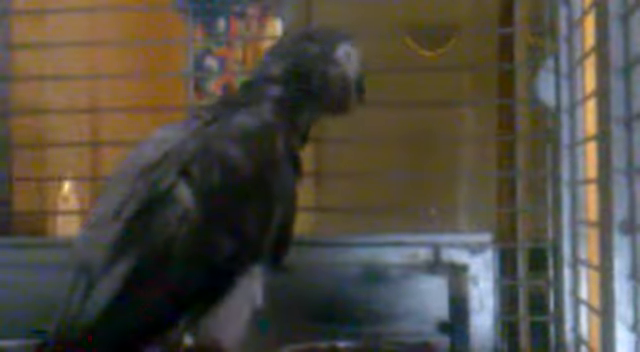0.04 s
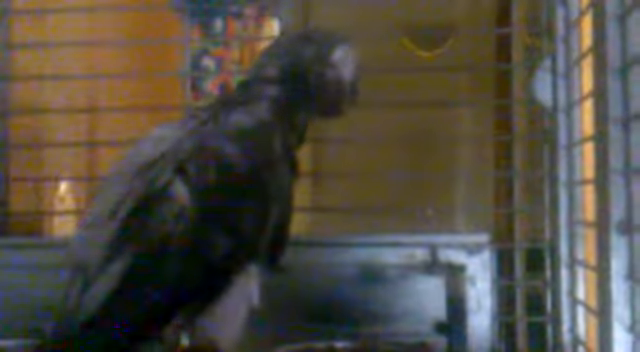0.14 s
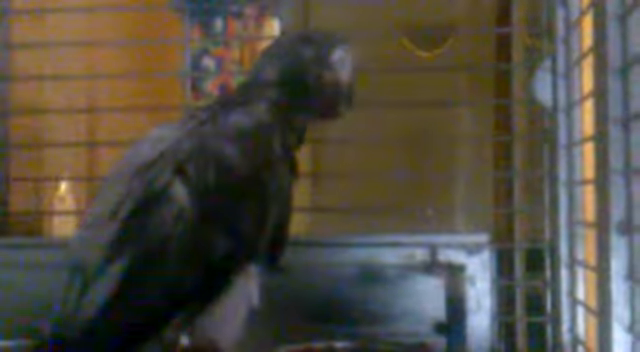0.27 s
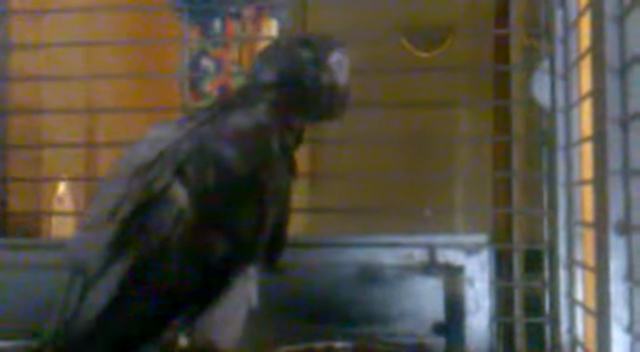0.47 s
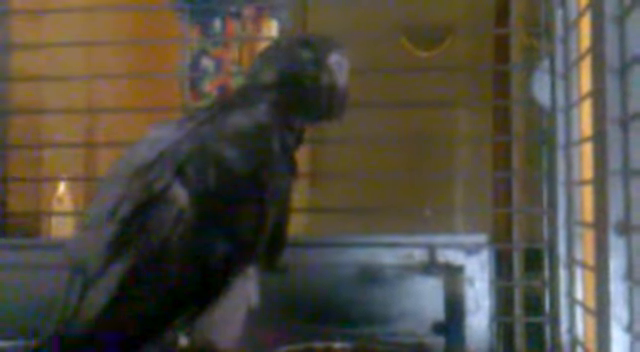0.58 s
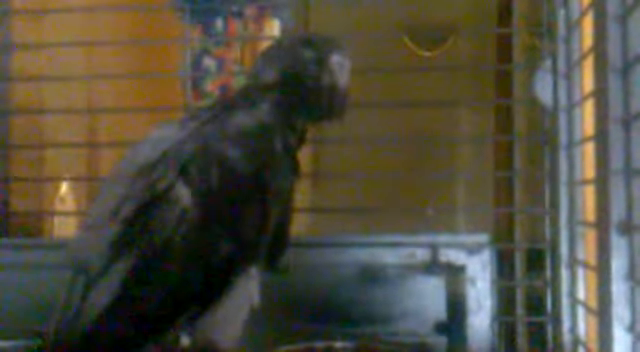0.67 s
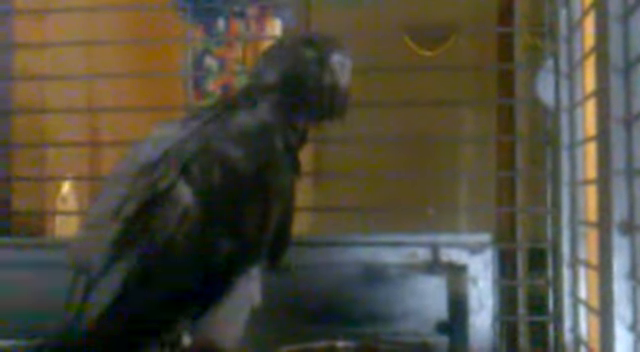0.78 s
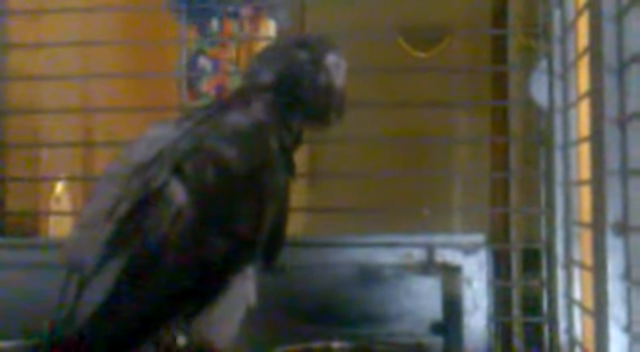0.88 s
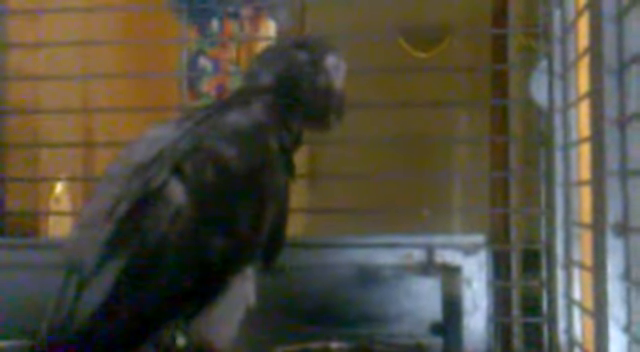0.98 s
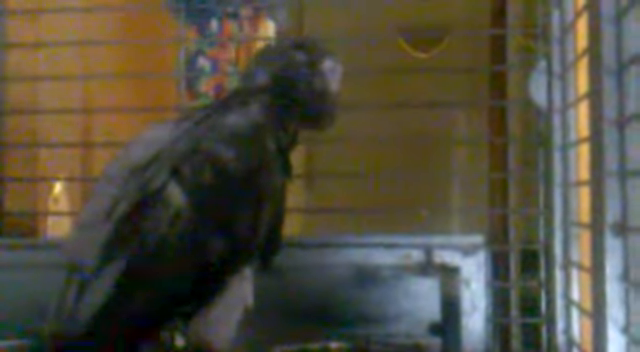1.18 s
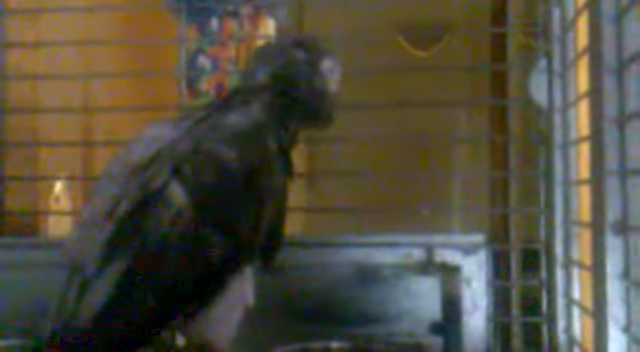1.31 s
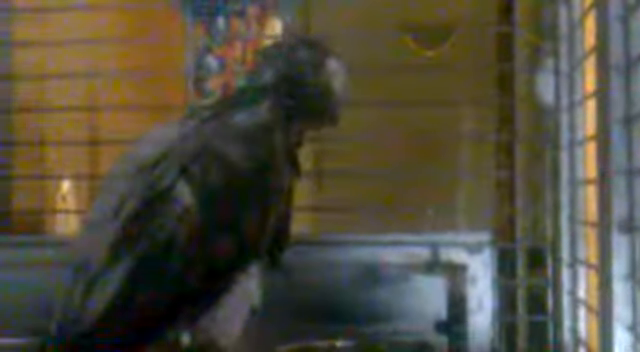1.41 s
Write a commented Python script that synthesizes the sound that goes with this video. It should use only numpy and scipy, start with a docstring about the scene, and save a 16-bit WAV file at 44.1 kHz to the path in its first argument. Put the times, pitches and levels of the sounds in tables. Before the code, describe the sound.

A parrot calls in a small hard room. A very short rising chirp at 0.05 s, a soft beak click at 0.12, then a fluttering hoarse rasp from 0.14 breaks into a piercing, overloaded squeal at 0.31-0.37. Room tail and thin metallic cage ring fade over a faint low hum, ducked by noise suppression. A weak high peep at 0.97 leads to a lower, harsh squawk at 1.06-1.17, then decay.

```python
"""In a small hard room, a parrot in a wire cage: a chirp, a rasp breaking into a squeal, a peep, a harsh squawk.
Its voice is one high tone with overtones that flutters and turns hoarse; husky puffs and a beak click join it.
The room answers with a tail of shaped noise, and the cage wire with two decaying sine rings.
An appliance hums behind it as unsteady sine lines over a dull rumble of noise.
The recorder's noise suppressor turns the sound down between calls; the loudest notes overload the microphone."""
import sys
import numpy as np
from scipy import signal
from scipy.fft import rfft, irfft, next_fast_len
from scipy.io import wavfile
from scipy.ndimage import uniform_filter1d, map_coordinates

SR = 44100
rng = np.random.default_rng(int(sys.argv[2]) if len(sys.argv) > 2 else 0)


def to_wav(s):
    """Save 16-bit WAV."""
    ch = np.atleast_2d(s).T  # columns
    pcm = np.round(np.clip(ch, -1, 1) * 32767)  # PCM
    wavfile.write(sys.argv[1], SR, pcm.astype(np.int16))


N = 63945  # samples


def amp(db):
    """Decibels to gain."""
    return 10 ** (np.asarray(db) / 20)


def unit(x):
    """Scale to rms 1."""
    return x / np.sqrt(np.mean(x ** 2) + 1e-20)


def along(points, hz):
    """Read (freq_hz, value) points on a log frequency axis."""
    point_hz, values = np.transpose(points)
    return np.interp(np.log(hz + 1), np.log(point_hz + 1), values)


def wobble(rate_hz):
    """A smooth random curve through rate_hz random knots a second."""
    return map_coordinates(rng.standard_normal(N // 8), [np.arange(N) * rate_hz / SR], mode="wrap")


def filtered(x, response):
    """Multiply the spectrum of x by a response of frequency."""
    padded = next_fast_len(N + SR // 2)
    hz = np.fft.rfftfreq(padded, 1 / SR)
    return irfft(rfft(x, padded) * response(hz), padded)[:N]


def noise(spectrum):
    """Coloured noise of rms 1."""
    return unit(filtered(rng.standard_normal(N), lambda hz: amp(along(spectrum, hz))))


def band(centre_hz, width_hz):
    """Noise of rms 1 in one bell-shaped resonance."""
    return unit(filtered(rng.standard_normal(N), lambda hz: np.exp(-((hz - centre_hz) / width_hz) ** 2 / 2)))


# The appliance's hum lines: freq_hz, level_db (rms, before the recorder)
HUM_LINES = [(55, -48.5), (119, -60), (165, -55), (328.4, -67.5), (485.5, -51.5)]
# Colour of the rumble under them: freq_hz, density_db (per Hz, relative)
RUMBLE_COLOUR = [(20, -11), (60, -0.5), (100, -6), (180, -10), (300, -16), (600, -18), (1200, -23.5),
                 (3000, -24), (8000, -31.5), (15000, -31.5)]
RUMBLE_DB = -49.5  # rms, before the recorder


def appliance():
    """Hum lines that drift slightly in level and phase, over a dull noise rumble."""
    t = np.arange(N) / SR
    lines = np.zeros(N)
    for hz, level_db in HUM_LINES:
        level = amp(level_db + 1.4 * wobble(5.4))
        lines += level * np.sin(2 * np.pi * (hz * t + rng.random()) + .2 * wobble(5.1))
    return np.sqrt(2) * lines + amp(RUMBLE_DB) * noise(RUMBLE_COLOUR)


# How long the room rings: freq_hz, t60_s
ROOM_T60 = [(200, 0.27), (1000, .36), (2200, 0.32), (3300, 0.33), (3900, 0.34), (5000, 0.3), (7000, .3),
            (12000, 0.19)]
# The tail's tint: freq_hz, gain_db
ROOM_COLOUR = [(300, -1), (1400, -0.5), (2200, -2.5), (2700, 2.5), (3200, -1.5), (3550, -3.5), (3900, 0),
               (4400, -1.5), (5200, 3), (5900, 0.5), (6600, 0.5), (8000, 0.5), (14000, -1)]
# The cage wire's ring: freq_hz, t60_s, level_db
CAGE = [(3205, .62, -7), (3880, .5, -13)]
ROOM_DB, WALL_DELAY_S = -2.5, .004  # tail re direct sound before its tint; the tail is half risen at the delay


def room(x):
    """Direct sound at the microphone, plus the room's decaying tail and the cage wire's narrow ring."""
    hz, t, grid = signal.stft(rng.standard_normal(SR * 3 // 4), SR, nperseg=256)
    tail_db = along(ROOM_COLOUR, hz)[:, None] - 60 * t / along(ROOM_T60, hz)[:, None]
    tail = signal.istft(grid * amp(tail_db), SR, nperseg=256)[1]
    age = np.arange(len(tail)) / SR
    tail = tail * np.clip(age / WALL_DELAY_S - .5, 0, 1)
    # level the tail by its decay at the first wire ring's frequency
    plain_decay = amp(-60 * age / along(ROOM_T60, CAGE[0][0]))
    answer = amp(ROOM_DB) * tail / np.linalg.norm(plain_decay)
    for ring_hz, t60, level_db in CAGE:
        fade = amp(-60 * age / t60)
        answer = answer + amp(level_db) * 2 * fade / fade.sum() * np.sin(2 * np.pi * ring_hz * age)
    return x + signal.fftconvolve(x, answer)[:N]


# Brief husky puffs: peak_s, half_length_s, level_db, centre_hz, half_width_hz
PUFFS = [(.185, 0.0399, -42, 378.3, 69), (.195, .05, -42, 880, 220), (0.195, 0.054, -33.5, 1946, 450),
         (0.352, .012, -21.5, 2006, 200), (0.995, .005, -42, 1900, 199.8), (1.027, .02, -41, 1634, 230),
         (1.085, .025, -35.5, 1336, 99.3), (1.129, .016, -35.5, 734, 81.4), (1.166, 0.01, -25.5, 1402, 141)]


def puffs():
    """Air swells and fades in one low resonance at a time."""
    t = np.arange(N) / SR
    total = np.zeros(N)
    for peak_s, half_s, level_db, centre_hz, width_hz in PUFFS:
        swell = np.exp(-((t - peak_s) / half_s) ** 2)
        total += amp(level_db) * swell * band(centre_hz, width_hz)
    return total


EDGE_S = 0.00095  # rise of the click and of each call
CLICK_S, CLICK_DB, CLICK_T60 = .119, -25.5, 0.023  # start s, level dB, decay s
# Colour of the beak's click: freq_hz, density_db (per Hz, relative)
BEAK = [(300, -23.5), (900, -17.5), (1400, -4), (1900, 0.5), (3000, -5), (6000, -29), (15000, -55)]


def beak_click():
    """A soft click as the beak opens for the rasp: a decaying burst of coloured noise."""
    age = np.arange(N) / SR - CLICK_S
    decay = amp(CLICK_DB - 60 * np.abs(age) / CLICK_T60)
    return np.clip(age / EDGE_S, 0, 1) * decay * noise(BEAK)


# The throat's colour on the hoarse part: freq_hz, density_db (per Hz, relative)
THROAT = [(600, -48.5), (1020, -32.5), (1350, -20.5), (1620, -19), (2050, -0.5), (2500, -2), (3100, -2.5),
          (3900, 0.5), (5000, -3), (5900, -15.5), (7000, -24), (7800, -28), (11000, -36.5), (15500, -45.5)]
# Air rushing through the beak: freq_hz, density_db (per Hz, relative)
AIR = [(100, -15), (250, -8), (400, 0.5), (750, -2), (1100, 0.5), (2000, -4), (5000, -18), (15000, -36.5)]
FLUTTER_HZ, TREMBLE_HZ = 749.1, 379.7  # random knots per second in pitch and in level
GRAIN_HZ, GRAIN_DB = 330, 2  # uneven bursts of hoarse noise: knots per second, depth
# upper resonance: dB re the hoarseness when the call is at 0 dB, then dB gained per dB of call level
SHRILL_HZ, SHRILL_WIDTH_HZ, SHRILL_DB, SHRILL_GROWTH = 6700, 380, -12, 0.55


def call(rows, voice):
    """One call: a fluttering, trembling tone with overtones and growl, and hoarse noise shriller when louder."""
    flutter, tremble_db, third_db, growl_db, air_db = voice
    t = np.arange(N) / SR
    time_s, *columns = np.transpose(rows)
    hz, level_db, octave_db, hoarse_db = [np.interp(t, time_s, column) for column in columns]

    phase = 2 * np.pi * np.cumsum(hz * (1 + flutter * wobble(FLUTTER_HZ))) / SR
    tone = np.sin(phase) + amp(octave_db) * np.sin(2 * phase)
    tone += amp(third_db) * np.sin(3 * phase)
    tone += amp(growl_db) * (np.sin(phase / 2) + np.sin(1.5 * phase))  # half-pitch growl
    tremble = unit(amp(tremble_db * np.minimum(wobble(TREMBLE_HZ), 1)))

    shrill = amp(SHRILL_DB + SHRILL_GROWTH * level_db) * band(SHRILL_HZ, SHRILL_WIDTH_HZ)
    hoarse = noise(THROAT) + shrill
    bursts = unit(amp(GRAIN_DB * np.minimum(wobble(GRAIN_HZ), 1)))

    sound = np.sqrt(2) * tremble * tone
    sound += amp(hoarse_db) * bursts * hoarse
    sound += amp(air_db) * noise(AIR)
    gate = np.clip(np.minimum(t - time_s[0], time_s[-1] - t) / EDGE_S + .5, 0, 1)
    return gate * amp(level_db) * sound


# The course of each call: time_s, pitch_hz, level_db, octave_db (re the tone), hoarse_db (re the tone)
CHIRP = [(.041, 2250, -42.5, -20.5, -38.5), (.045, 2500, -25, -19, -37.5), (.051, 2657, -26, -16, -36),
         (.055, 2855, -18, -25, -42.5), (.059, 3093, -12, -32.5, -47.5), (.063, 3350, -32, -26, -37.5)]
RASP = [(.14, 2750, -43, -22.5, -4), (.165, 2650, -28, -26, -11), (.195, 2700, -31, -25, -6.5),
        (.202, 2830, -22, -28, -10), (.23, 3100, -23, -19.5, -7), (.24, 2501, -21.5, -8, -6.5),
        (.25, 2203, -24, 2.5, -3), (.262, 1990, -26, -6.5, -1), (.274, 2857, -17.5, -8.5, -5.5),
        (.283, 3107, -27, -14, -6), (.293, 2593, -20.5, -13.5, -1.5), (.299, 3218, -20, -18, -3),
        (.305, 3170, -24, -18, 0.5), (.311, 3270, -15, -28.5, -9.5), (.322, 3180, -14, -28, -13.5)]
SQUEAL = [(.305, 4350, -21, -38, -10), (.313, 4750, -9, -42, -14), (.318, 4400, -9, -38, -16),
          (.321, 4000, -16, -31, -13), (.325, 3800, 1, -37.5, -22), (.331, 3280, -1.5, -24, -19),
          (.339, 3150, -2, -23, -13), (.348, 2950, -14, -8, 5), (.355, 3250, -1, -23, -17),
          (.363, 3230, -2, -22, -18), (.371, 3190, -25, -20, -7)]
PEEP = [(.971, 3226, -36.5, -18.5, -14.5), (.975, 3330, -25.5, -19.5, -16.5),
        (.985, 3386, -23.5, -29.5, -15.5), (.99, 3400, -32.5, -23.5, -5.5), (1.008, 3300, -27, -26.5, -13),
        (1.018, 3106, -29, -18.5, -5.5), (1.04, 3150, -35, -13, 2), (1.058, 3050, -35, -14, 2)]
UNDERTONE = [(.965, 2450, -59, 21, -2), (.969, 2530, -54, 18.5, -4.5), (.975, 2552, -41, 1, -12.5),
             (.983, 2540, -27, -7, -16), (.988, 2540, -45, -5, -12), (1.011, 2560, -58.5, 8.5, -2.5),
             (1.014, 2585, -50.5, 18.5, -2), (1.018, 2600, -57, 8.5, -1)]  # a second voice under the peep
SQUAWK = [(1.056, 2799, -30.5, -3.5, -2.5), (1.073, 2249, -26, -1, 3), (1.078, 2154, -21.5, 5, 1),
          (1.086, 2016, -16, 0, -3.5), (1.091, 1950, -4, -4.5, -10.5), (1.097, 2054, -15.5, 1.5, -3.5),
          (1.105, 2339, -5.5, -9, -8.5), (1.112, 2280, -14.5, 1.5, -0.5), (1.121, 2199, -15.5, 4.5, 3),
          (1.131, 2081, -12.5, 3.5, -1), (1.141, 2199, -12, -6.5, -1.5), (1.151, 2547, -16.5, 1, 2.5),
          (1.161, 2450, -15.5, -8.5, 6), (1.168, 2404, -31, -4, 4)]
# How each is voiced: flutter_share (of pitch), tremble_db, third_harmonic_db, growl_db, air_db (last three re tone)
CHIRP_VOICE = (-0.0037, 1.5, -52, -60.5, -59.5)
RASP_VOICE = (.06, 5.5, -42, -32, -27)
SQUEAL_VOICE = (0.07, 2, -42.5, -51.5, -35)
PEEP_VOICE = (-0.04, 3.5, -45.5, -45, -43)
SQUAWK_VOICE = (.055, 4, -22, -35, -33.5)


def parrot_calls():
    """All the calls in turn, each with its own draw of the room's tail."""
    calls = [
        (CHIRP, CHIRP_VOICE), (RASP, RASP_VOICE), (SQUEAL, SQUEAL_VOICE),
        (PEEP, PEEP_VOICE), (UNDERTONE, PEEP_VOICE), (SQUAWK, SQUAWK_VOICE),
    ]
    return sum(room(call(rows, voice)) for rows, voice in calls)


def scene():
    """The hum behind, then the beak click, the puffs and the calls in the room."""
    background = appliance()
    small_sounds = room(beak_click() + puffs())
    return (background + small_sounds + parrot_calls())[None]


OPEN_DB, SHUT_DB = -17.5, -52  # treble level at which the suppressor is fully open, fully shut
DUCK_DB, START_DUCK_DB, RELEASE_DB_PER_S = 18, 11, 46.5  # deepest cut, cut at the start, closing speed
DRIVE_DB, CLIP_HARDNESS = -1, 9.2  # gain into the overload, sharpness of its knee
TOP_HZ = 15700  # band limit


def record(dry):
    """A noise suppressor that opens at once and closes slowly, then overload and the band limit."""
    x = dry[0]
    treble_power = uniform_filter1d(filtered(x, lambda hz: hz > 1000) ** 2, size=256)
    level_db = 10 * np.log10(np.abs(treble_power) + 1e-12)
    wanted_db = -DUCK_DB * np.clip((OPEN_DB - level_db) / (OPEN_DB - SHUT_DB), 0, 1)
    wanted_db[0] = -START_DUCK_DB  # it starts partly closed
    # the running maximum lets the gain rise freely but fall only at the release speed
    sag_db = RELEASE_DB_PER_S * np.arange(N) / SR
    gain_db = np.maximum.accumulate(wanted_db + sag_db) - sag_db
    x = x * amp(gain_db + DRIVE_DB)
    x = x / (1 + np.abs(x) ** CLIP_HARDNESS) ** (1 / CLIP_HARDNESS)
    return filtered(x, lambda hz: hz < TOP_HZ)[None]


dry = scene()
out = record(dry)
to_wav(out)
```